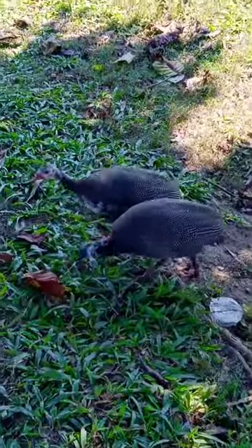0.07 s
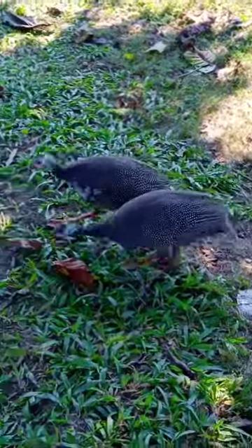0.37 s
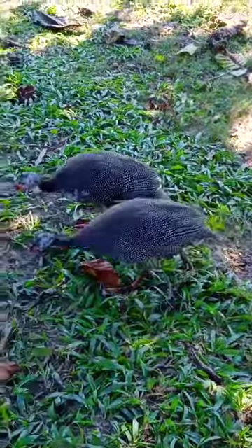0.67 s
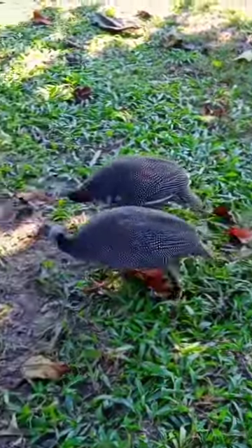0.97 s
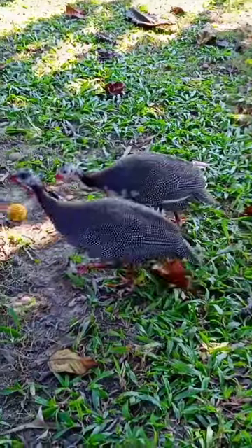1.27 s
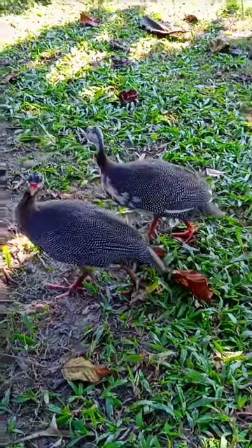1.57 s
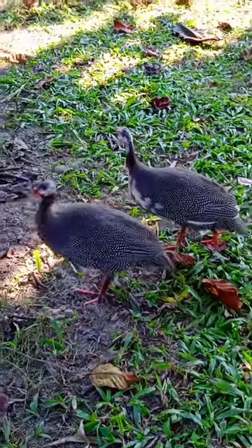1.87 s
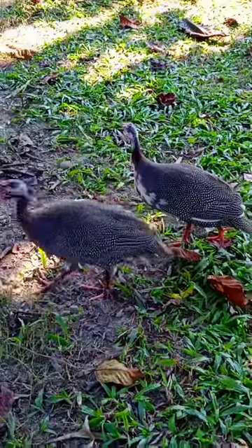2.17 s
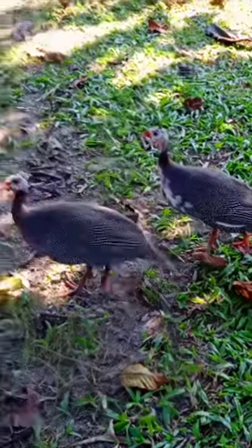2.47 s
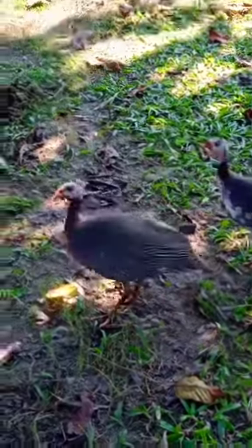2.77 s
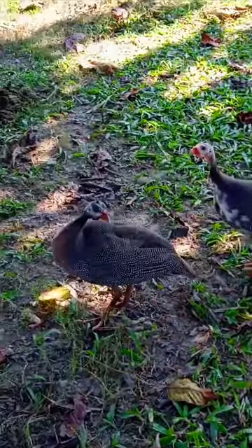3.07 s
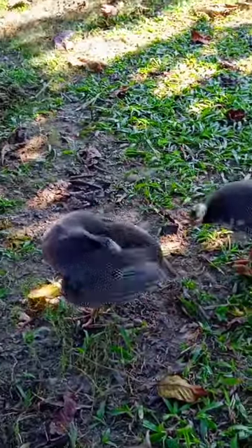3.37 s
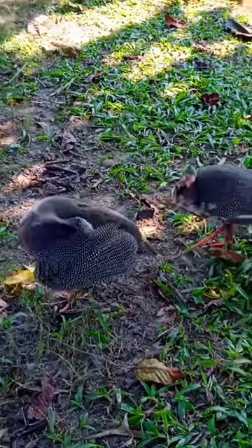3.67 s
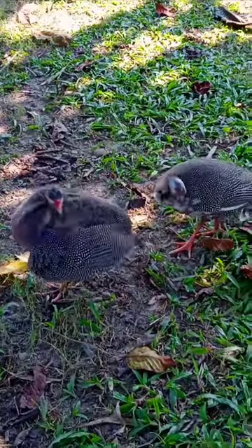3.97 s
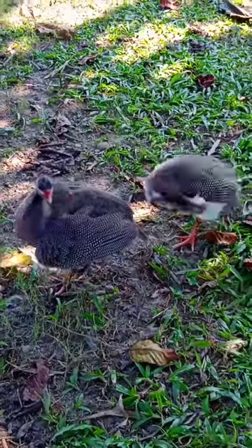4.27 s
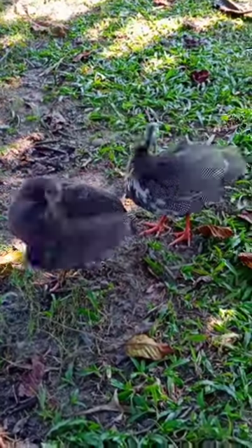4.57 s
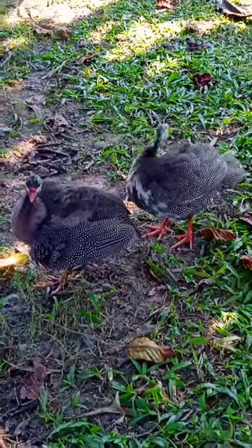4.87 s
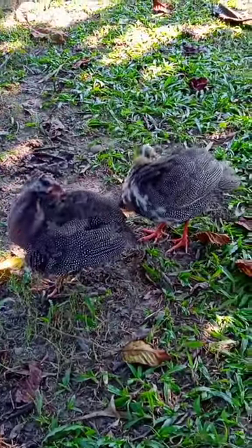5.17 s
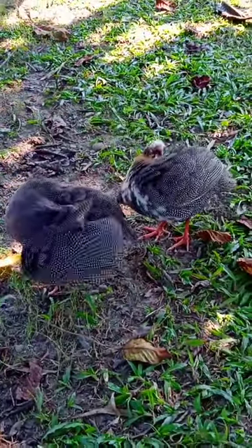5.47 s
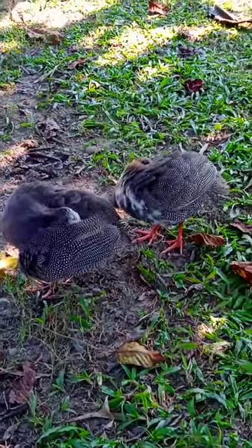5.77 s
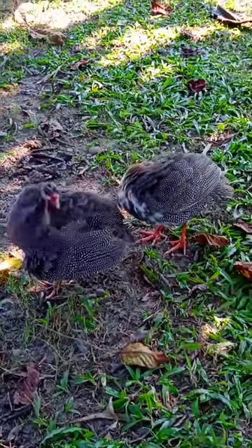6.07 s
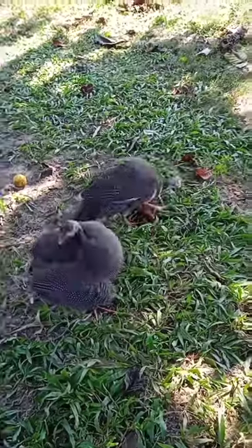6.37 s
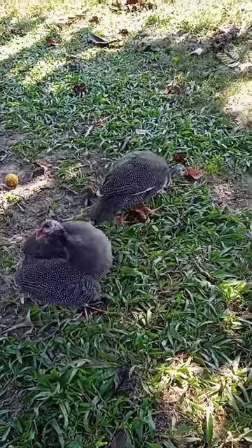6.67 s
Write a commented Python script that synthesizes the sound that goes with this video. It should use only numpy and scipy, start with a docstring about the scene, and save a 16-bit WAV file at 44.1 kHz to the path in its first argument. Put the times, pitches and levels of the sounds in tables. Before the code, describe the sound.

Close to a hand-held microphone in a garden, a guineafowl repeats one short, harsh call about four times a second without a break. Each call starts rough, rings metallically and ends in a brief falling coo. The calls soon turn fizzier, and a small bird chirps twice, faintly and far off. Insects hiss quietly behind, and the hand rumbles softly on the microphone, with one firmer bump near the end.

```python
"""Shaded grass in a garden, a hand-held microphone close to a guineafowl; insects hiss over a far hum.
From the start the bird repeats one short harsh call about four times a second, each a train of syrinx
pulses: a rough start, a metallic ring in the beak, then a cleaner falling coo. The garden echoes faintly.
Towards two seconds the calls turn fizzier, and soon after a small bird chirps twice, far off.
The hand rumbles softly on the microphone throughout, with its firmest bump just before the end."""
import sys
import numpy as np
from scipy import signal
from scipy.fft import rfft, irfft, next_fast_len
from scipy.io import wavfile
from scipy.ndimage import map_coordinates

SR = 44100
rng = np.random.default_rng(int(sys.argv[2]) if len(sys.argv) > 2 else 0)


def materialize(psi):
    """Save the field psi as 16-bit PCM at rate SR to the path in sys.argv[1].

    A 1-D psi becomes a single channel; in a 2-D psi each row is a channel.
    """
    bounded = np.clip(np.atleast_2d(psi).T, -1, 1)
    quanta = np.round(bounded * 32767).astype(np.int16)
    wavfile.write(sys.argv[1], SR, quanta)


N = 296352


def amp(db):
    """Decibels to gain."""
    return 10 ** (np.asarray(db) / 20)


def unit(x):
    """Scaled to rms 1."""
    return x / np.sqrt(np.mean(x ** 2) + 1e-20)


def along(points, hz):
    """(Hz, value) points read on a log axis."""
    f, v = np.transpose(points)
    return np.interp(np.log(hz + 1), np.log(f + 1), v)


def curves(rows, at):
    """Each column after the first, read at the given places."""
    places, *columns = np.transpose(rows)
    return [np.interp(at, places, column) for column in columns]


def wobble(rate):
    """A smooth random curve, rate knots a second."""
    return map_coordinates(rng.standard_normal(int(N * rate / SR) + 4), [np.arange(N) * rate / SR])


def filtered(x, response):
    """x through a complex frequency response."""
    size = next_fast_len(N + SR // 2)
    return irfft(rfft(x, size) * response(np.fft.rfftfreq(size, 1 / SR)), size)[:N]


def coloured(x, spectrum):
    """x through a smooth spectrum, at rms 1."""
    return unit(filtered(x, lambda hz: amp(along(spectrum, hz))))


def resonated(x, modes):
    """x through a bank of resonances of alternating sign, at rms 1."""
    def response(f):
        return sum((-1) ** k * amp(db) * 1j * f * width / (hz * hz - f * f + 1j * f * width)
                   for k, (hz, width, db) in enumerate(modes))
    return unit(filtered(x, response))


def background():
    """A faint steady wash with the colour of the calls, like their lingering echo; insects; a far hum."""
    # The wash's spectrum. Each row: frequency in Hz, relative level in dB.
    wash_colour = [(30, -42), (90, -14.5), (150, -22.5), (400, -14), (800, -23.5), (1150, -9), (1300, -11),
                   (1570, 0), (1950, -5), (2300, -13.5), (3200, -11.5), (6000, -20), (8000, -35),
                   (10000, -24), (15000, -50)]
    # The insects' bands. Each row: centre in Hz, width in Hz, relative level in dB.
    insect_bands = [(3853, 40, 1.5), (4530, 410, -4)]
    # Slow drift. Each row: time in seconds, wash and insect levels in dB before their trims.
    drift = [(0.0, -57, -51.5), (2.08, -54, -55), (2.73, -54, -51.5), (4.12, -56, -53.5), (4.96, -62, -57),
             (5.97, -58.5, -54), (6.72, -59.5, -58.5)]
    # The far hum. Each row: time in seconds, mean level in dB.
    hum_levels = [(0, -77.5), (3.6, -75.5), (4.3, -99), (6.72, -83)]
    t = np.arange(N) / SR
    wash_db, insect_db = curves(drift, t)
    wash = amp(wash_db - 0.34 + 1.7 * wobble(8.1)) * coloured(rng.standard_normal(N), wash_colour)
    insects = amp(insect_db - 1.5 + 1.14 * wobble(27)) * resonated(rng.standard_normal(N), insect_bands)
    hum = amp(curves(hum_levels, t)[0] + 1.4 * wobble(4.32)) * unit(np.sin(2 * np.pi * 193 * t))
    return wash + insects + hum


def call_controls():
    """For every sample: the share of the current call gone by (0-1 within it), its pitch and levels."""
    # The calls. Each row: start and length in seconds, base pitch in Hz, base voice and coo levels in dB.
    calls = [(-.105, 0.11, 389.2, -32.5, -32), (0.149, 0.11, 392.4, -32, -29.5),
             (.378, 0.1, 395.5, -34, -33), (0.616, 0.1, 397, -32, -29.5), (0.875, 0.095, 389.5, -31, -29.5),
             (1.145, 0.1, 386.6, -31, -29), (1.479, 0.094, 393.1, -29.5, -27.5),
             (1.731, 0.098, 395, -30.5, -31), (2.007, 0.099, 393.1, -31, -32.5),
             (2.259, 0.1, 396.5, -30.5, -33), (2.518, 0.1, 394.2, -28.5, -36),
             (2.769, 0.1, 391.6, -30.5, -29), (3.053, 0.1, 387.1, -30, -30),
             (3.293, 0.11, 399.3, -31.5, -33.5), (3.612, .1, 390.6, -29.5, -31.5),
             (3.877, 0.1, 391.4, -30, -31), (4.135, 0.098, 394.9, -30.5, -45),
             (4.369, 0.1, 396.7, -30.5, -36), (4.602, .105, 396.4, -32.5, -35.5),
             (4.835, 0.1, 389, -33, -37.5), (5.05, 0.11, 394, -34, -34), (5.274, 0.12, 388, -34, -32.5),
             (5.502, 0.12, 390.2, -34.5, -33), (5.743, 0.11, 382.8, -35.5, -31),
             (5.985, 0.11, 388.6, -33, -29), (6.217, 0.11, 386.5, -35, -36.5),
             (6.466, 0.11, 391, -35, -33.5), (6.692, .103, 392, -36.5, -31.5)]
    t, rows = np.arange(N) / SR, np.array(calls)
    current = np.maximum(np.searchsorted(rows[:, 0] - .05, t) - 1, 0)  # a row takes over 50 ms early
    start, length, pitch_hz, voice_db, coo_db = rows[current].T
    return (t - start) / length, pitch_hz, voice_db, coo_db


def syrinx(share):
    """The pitch scoops up, cracks low and rough for a moment, sags, then drops as the syrinx slackens."""
    top_at, slack_at, slackening = .3, .78, .13  # shares of the call
    crack_at, crack_width, crack_scatter = .235, .1, .0199  # shares of the call
    top, scoop, sag, drop, crack_dip = 1.04, .11, .11, .09, .05  # relative to the base pitch
    share = np.clip(share, 0, 1)
    crack = np.exp(-((share - crack_at - crack_scatter * wobble(4)) / crack_width) ** 2)
    starting = np.maximum(1 - share / top_at, 0)
    past_top = np.maximum(share - top_at, 0)
    slack = np.maximum(share - slack_at, 0) / (1 - slack_at)
    glide = top - scoop * starting - sag * past_top - drop * slack ** 2 - crack_dip * crack
    loosened = np.clip(1 + (share - slack_at) / slackening, 0, 1)
    rough = .32 + .27 * starting + .66 * crack + .25 * loosened
    return glide, np.clip(rough, 0, 1), crack


def envelope(share, part):
    """Gain of one part of the call while air flows: quiet lead-in, attack, hold, ever faster release."""
    # Swell and fade by part. Each row: full from, full until, attack per 20 dB and release to -20 dB,
    # all in shares of the call, then lead-in level in dB.
    shapes = {"opening": (0.3, 0.14, 0.26, 0.17, -16.5), "voice": (0.1862, 0.19, 0.2, 1.0, -10.5),
              "ring": (0.2016, 0.44, 0.13, 0.54, -22), "fizz": (0.24, 0.54, 0.13, 0.39, -26.5),
              "whistle": (0.58, 0.59, 0.37, 0.26, -40), "coo": (0.69, .77, 0.66, 0.4, -17.5),
              "creak": (0.8251, 1.2, .11, .12, -40)}
    start_at, stop_at = -0.0075, 0.96  # airflow half open, half shut, in shares of the call
    fade_in, fade_out = 0.035, 0.093  # half widths of those two ramps
    full_from, full_until, attack, release, lead_in_db = shapes[part]
    rise_db = np.maximum(-20 * np.maximum(full_from - share, 0) / attack, lead_in_db)
    fall_db = -20 * (np.maximum(share - full_until, 0) / release) ** 2
    ramp = lambda x: (1 + np.sin(np.pi / 2 * np.clip(x, -1, 1))) / 2
    airflow = ramp((share - start_at) / fade_in) * ramp((stop_at - share) / fade_out)
    return amp(rise_db + fall_db) * airflow


def pulse_train(cycles, harmonics):
    """Sharp pulses: the first harmonics, all in step."""
    return unit(sum(np.cos(2 * np.pi * k * cycles) for k in range(1, harmonics + 1)))


def throat_voice(cycles, rough):
    """Syrinx pulses through the throat; the rougher the voice, the more they break up into noise."""
    # Windpipe and throat resonances. Each row: centre in Hz, width in Hz, relative level in dB.
    throat = [(1065, 78.6, -7.5), (1535, 290, -2.5), (1908, 256, 0), (2162, 130, -0.5), (2627, 190, -0.5),
              (2846, 108, 0), (3318, 310, -0.5), (3992, 97, 1)]
    chaos = coloured(rng.standard_normal(N), [(5000, 0), (6000, -30)])
    pulses = pulse_train(cycles, harmonics=13)
    return resonated(np.sqrt(1 - rough ** 2) * pulses + rough * chaos, throat)


def beak_ring(cycles, age_s, share, rough):
    """Each pulse rings the beak; pulses surge in groups of four or five, the ring sliding down in each."""
    # The beak's resonance. Each row: share of the call, frequency in Hz.
    resonance = [(0, 4250), (.4, 4490), (.6, 4250), (.85, 4600)]
    ring_s, scatter, bend = 0.0003586, 0.021, 0.04  # scatter and bend in shares of the frequency
    pulse_number = (cycles - cycles.min() + cycles.min() % 1).astype(int)
    detune, size, slip = rng.standard_normal((4000, 3))[pulse_number].T
    group_phase = np.cumsum(85 + 18 * wobble(60)) / SR % 1
    hz = curves(resonance, share)[0] * (1 + scatter * detune + bend * (1 - 2 * group_phase))
    pulse_db = 1.06 * size + 3.0 * np.sqrt(rough) * np.sin(2 * np.pi * group_phase)
    swell = unit((age_s / ring_s) ** 2 * np.exp(-age_s / ring_s) * amp(pulse_db))
    phase = 2 * np.pi * hz * (age_s - 2 * ring_s) + 1.6 * rough * slip
    ring, overtone = unit(swell * np.sin(phase)), unit(swell * np.cos(2 * phase))
    return swell, ring, overtone


def escaping_air(steady, rough, swell, overtone):
    """The rasp of pulsed air and the fizz of a wide-open beak."""
    # Spectra of rasp and fizz. Each row: frequency in Hz, relative level in dB.
    rasp_colour = [(200, -46), (700, -18.5), (1200, -3.5), (2000, 2), (2750, 1.5), (3400, 3.5), (4900, 12),
                   (5400, 0.5), (6400, 0), (7500, -5), (9500, -16), (15500, -25.5)]
    fizz_colour = [(2000, -34), (5500, -9), (7500, -1), (10000, 5), (12000, 3), (13200, -4), (14500, 0),
                   (15600, -5.5)]
    cycles = steady + 0.04 * rough * wobble(250)
    buzz = (1 - rough) ** 2 * pulse_train(cycles, harmonics=33)  # clean pulses reach the treble
    rasp = coloured((swell + 1) * rng.standard_normal(N) + 0.22 * buzz, rasp_colour)
    fizz = coloured((swell + 1) * rng.standard_normal(N) + .9 * buzz + .7 * overtone, fizz_colour)
    return rasp, fizz


def near_bounce(x, delay_s, gain):
    """A close reflection fills the gaps between pulses and ripples the treble."""
    return filtered(x, lambda hz: (1 + gain * np.exp(-2j * np.pi * hz * delay_s)) / np.hypot(1, gain))


def narrow_notches(x):
    """Narrow fixed notches hollow the call's tone."""
    # The notches. Each row: centre in Hz, width in Hz.
    notches = [(1280, 162), (2400, 218), (3080, 358), (3770, 24), (4140, 86)]
    notch = lambda f, hz, width: (hz * hz - f * f) / (hz * hz - f * f + 1j * f * width)
    return filtered(x, lambda f: np.prod([notch(f, hz, width) for hz, width in notches], axis=0))


def singing_harmonics(steady, share, rough, voice_db, coo_db):
    """Single harmonics swell as they pass a resonance, a little earlier or later in each call."""
    def harmonic(order):
        phase = 2 * np.pi * order * steady + 0.93 * rough * wobble(200)
        return unit(np.sin(phase) * amp(2.6 * wobble(110)))
    shifted = share + 0.03 * wobble(4.88)
    opening_db = -38 + 2.2 * (voice_db - voice_db.mean())  # stands out in the louder calls
    opening = amp(opening_db) * envelope(shifted, "opening") * harmonic(3)
    coo = amp(coo_db + 2.0) * envelope(shifted, "coo") * (harmonic(4) + amp(-21) * harmonic(3))
    whistle_db = -29 + 2.0 * wobble(4.01)
    whistle = amp(whistle_db) * envelope(shifted, "whistle") * (harmonic(10) + amp(-6) * harmonic(9))
    fundamental = amp(-56.5 - 81 * (share - .56) ** 2) * harmonic(1)
    return opening + coo + whistle + fundamental


def closing_creak(share, swell):
    """The slack syrinx ends each call in pulses of noise."""
    # The creak's spectrum. Each row: frequency in Hz, relative level in dB.
    colour = [(300, -50), (650, -16), (920, -7), (1200, -3), (1700, 11.5), (2300, -16), (3000, 4),
              (4500, -9), (7000, -23)]
    return envelope(share, "creak") * coloured(swell * rng.standard_normal(N), colour)


def guineafowl():
    """Close by, one pulse train drives the throat, its harmonics, the ringing beak and the escaping air."""
    # The treble's drift over the calls. Each row: time in seconds, beak ring in dB, fizz in dB.
    treble_levels = [(.2, -23.5, -47), (1.5, -24, -55), (1.75, -24.5, -38.5), (2.3, -25, -32),
                     (3.7, -26, -31), (4.6, -25, -32), (6.0, -26, -33.5), (6.4, -25.5, -39.5)]
    ring_db, fizz_db = curves(treble_levels, np.arange(N) / SR)
    share, pitch_hz, voice_db, coo_db = call_controls()
    glide, rough, crack = syrinx(share)
    steady = np.cumsum(pitch_hz * glide * (1 + 0.006035 * wobble(40))) / SR  # phase in cycles
    cycles = steady + 0.067 * rough * wobble(250)  # pulses come early or late
    age_s = cycles % 1 / (pitch_hz * glide)  # time since the last pulse
    voice_gain = amp(voice_db + 5.5 * crack + 3.0 + wobble(45))  # louder in the crack
    voice = voice_gain * envelope(share, "voice") * throat_voice(cycles, rough)
    swell, ring, overtone = beak_ring(cycles, age_s, share, rough)
    rasp, fizz = escaping_air(steady, rough, swell, overtone)
    treble = amp(ring_db) * envelope(share, "ring") * (ring + amp(-2.5) * rasp)
    treble += amp(fizz_db) * envelope(share, "fizz") * fizz
    treble = near_bounce(treble, delay_s=.001505, gain=.3)
    creak = amp(voice_db - 4.5) * closing_creak(share, swell)
    singing = singing_harmonics(steady, share, rough, voice_db, coo_db)
    return singing + narrow_notches(voice + treble) + creak


def echo(x, decay):
    """A diffuse tail in which each frequency dies at its own speed."""
    # The tail's spectrum at its onset. Each row: frequency in Hz, relative level in dB.
    colour = [(300, 9.5), (1600, -11), (2700, -18), (4200, -6.5), (6500, -0.5), (14000, -1)]
    hz, t, noise = signal.stft(rng.standard_normal(SR), SR, nperseg=256)
    tail_db = along(colour, hz)[:, None] - 60 * t / along(decay, hz)[:, None]
    tail = signal.istft(noise * amp(tail_db), SR, nperseg=256)[1]
    return signal.fftconvolve(x, tail / np.linalg.norm(tail))[:N]


def garden_echo(x):
    """Nearby shrubs answer at once; farther trees and walls return a long faint tail."""
    # Near and far decay. Each row: frequency in Hz, seconds to fall by 60 dB.
    shrubs = [(300, 0.04), (1600, 0.22), (4500, 0.13), (14000, 0.055)]
    trees_and_walls = [(300, 0.64), (1600, 1.45), (4300, 1.3), (7000, 0.37), (14000, 0.24)]
    return amp(-14) * echo(x, shrubs) + amp(-28) * echo(x, trees_and_walls)


def handling():
    """Dull, uneven rumbles as the hand shifts on the microphone."""
    # Soft bumps of the hand. Each row: time in seconds, level in dB.
    bumps = [(0.192, -47), (.42, -51), (1.14, -55), (4.16, -63), (4.34, -56), (5.33, -61), (5.98, -59.5),
             (6.6, -58), (6.65, -42.5)]
    colour = [(25, -5.0), (75, 6.5), (120, -2.5), (220, -18.5), (600, -51), (2000, -100)]  # Hz, dB
    t = np.arange(N) / SR
    level = amp(-79.5 + 6.77 * wobble(7.7))
    level += sum(amp(db) * np.exp(-((t - at) / 0.018) ** 2) for at, db in bumps)
    return level * coloured(rng.standard_normal(N), colour)


def far_bird():
    """A small bird far off gives two faint, short, falling chirps."""
    # The chirps. Each row: middle in seconds, peak level in dB.
    chirps = [(2.44, -55), (2.74, -57)]
    pitch_hz, fall_hz_per_s, half_length_s = 2460, 2000, .018
    t = np.arange(N) / SR

    def chirp(offset_s):
        cycles = (pitch_hz - fall_hz_per_s * offset_s / 2) * offset_s
        return np.exp(-(offset_s / half_length_s) ** 2) * np.sin(2 * np.pi * cycles)
    return sum(amp(db) * chirp(t - at) for at, db in chirps)


def scene():
    """One microphone, the guineafowl close by and the garden behind it."""
    bird = guineafowl()
    return (bird + garden_echo(bird) + background() + far_bird() + handling())[None]


def record(dry):
    """The recorder keeps nothing above its band limit."""
    top_hz = 15700
    return filtered(dry[0], lambda hz: 1 / (1 + (hz / top_hz) ** 200))[None]


dry = scene()
out = record(dry)
materialize(out)
```